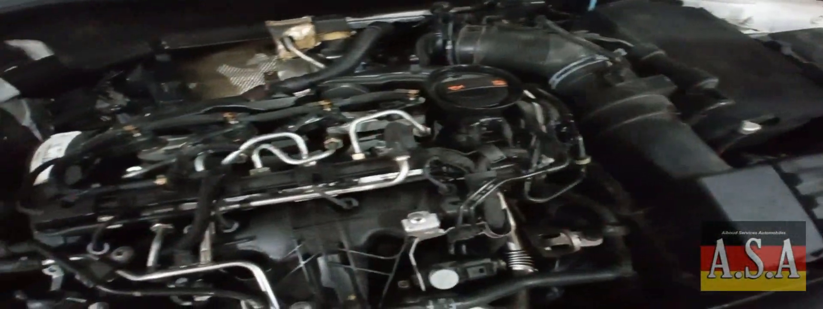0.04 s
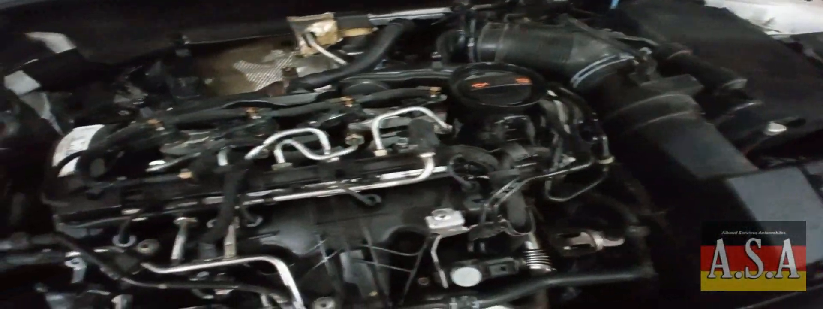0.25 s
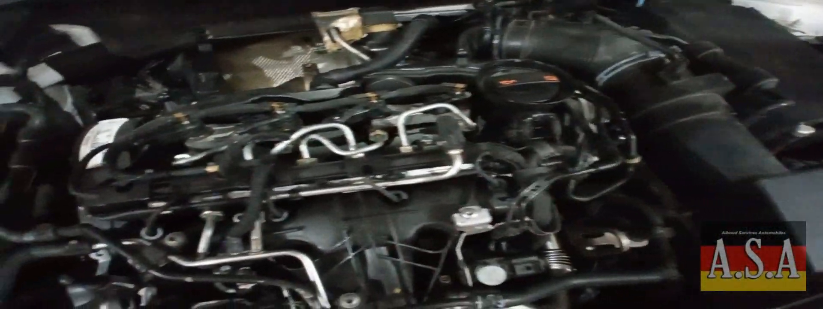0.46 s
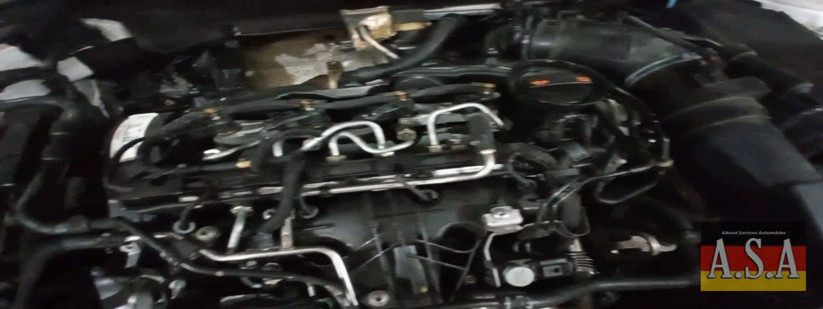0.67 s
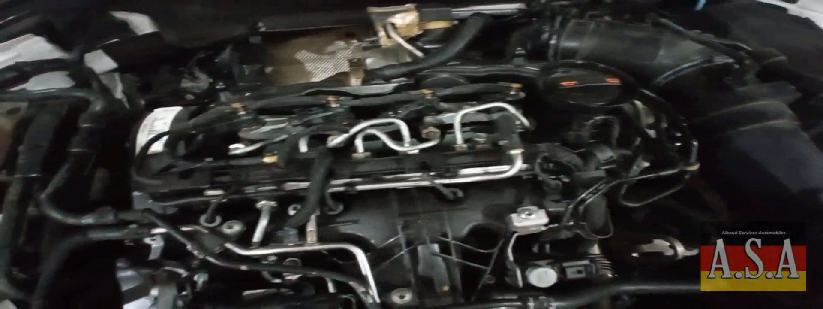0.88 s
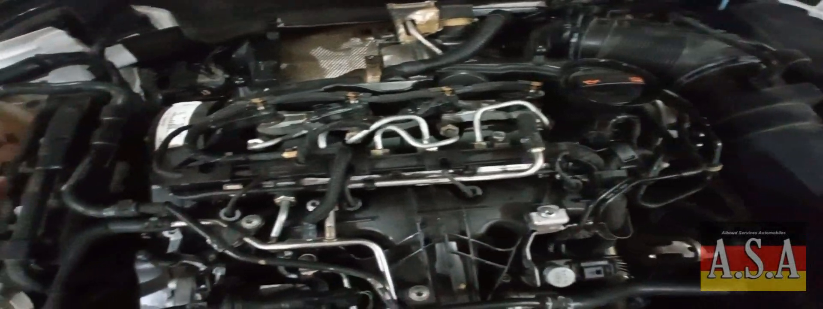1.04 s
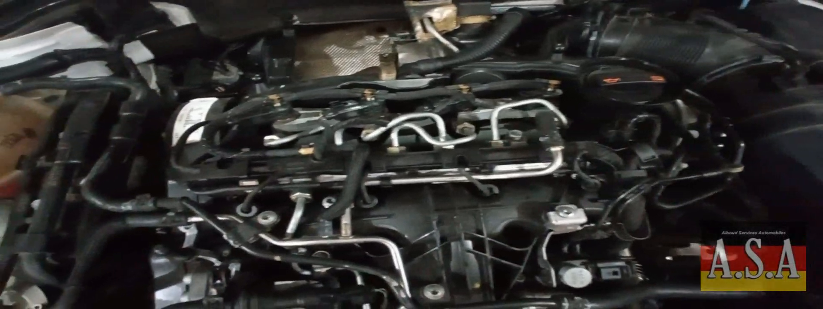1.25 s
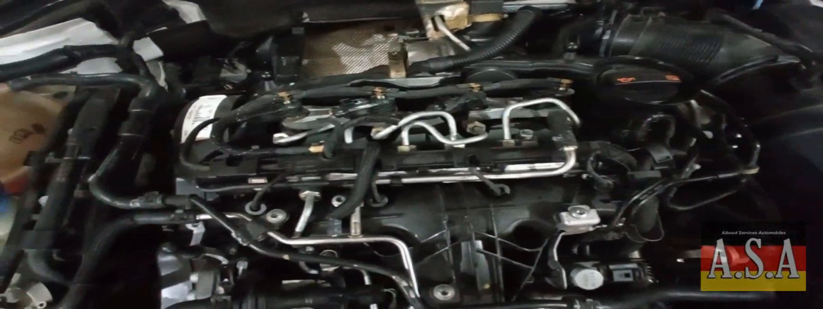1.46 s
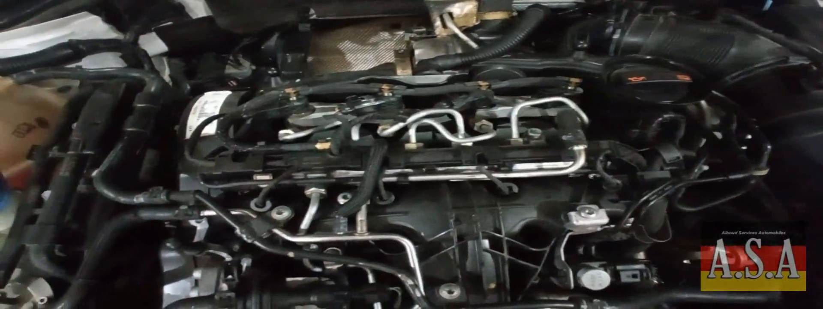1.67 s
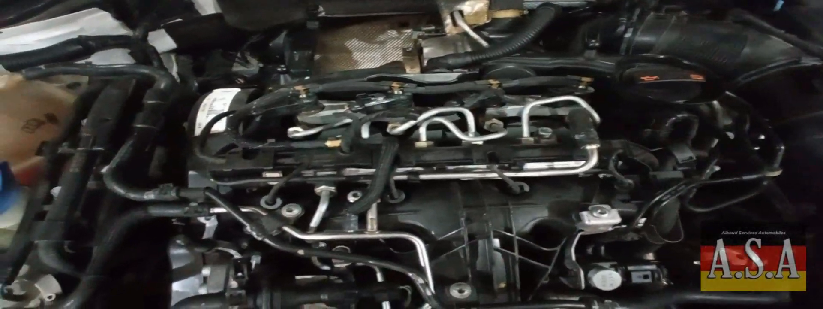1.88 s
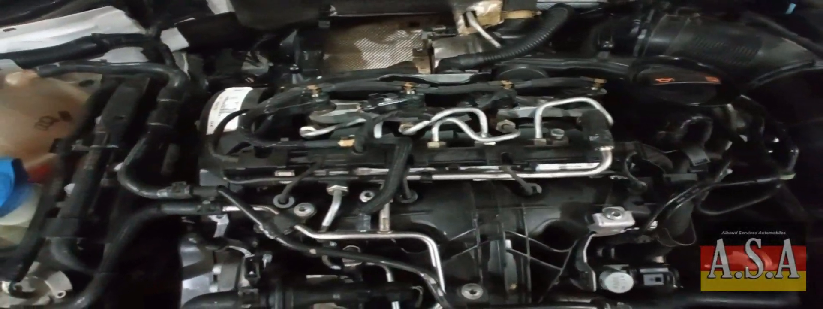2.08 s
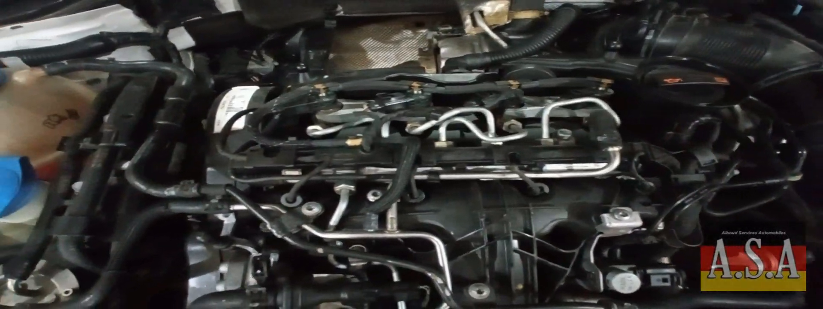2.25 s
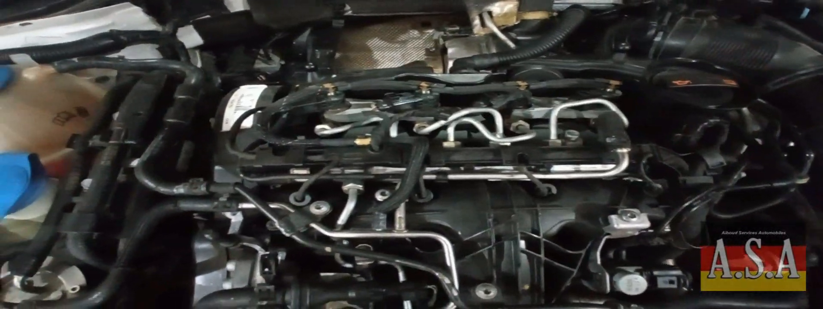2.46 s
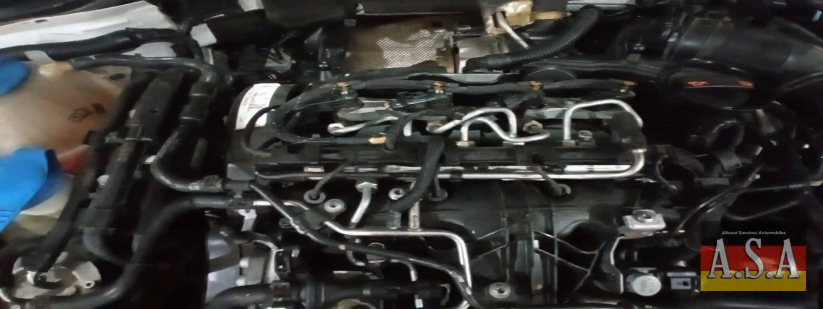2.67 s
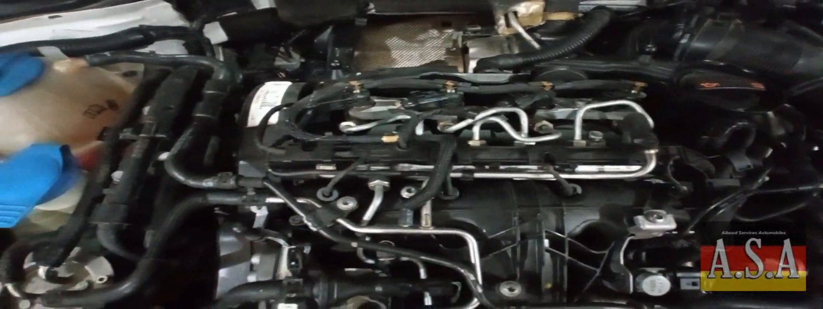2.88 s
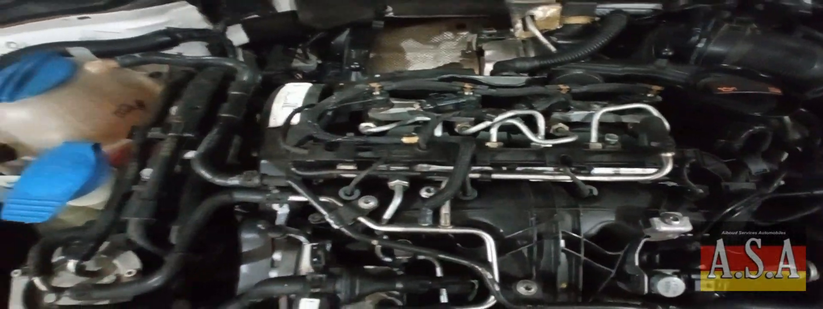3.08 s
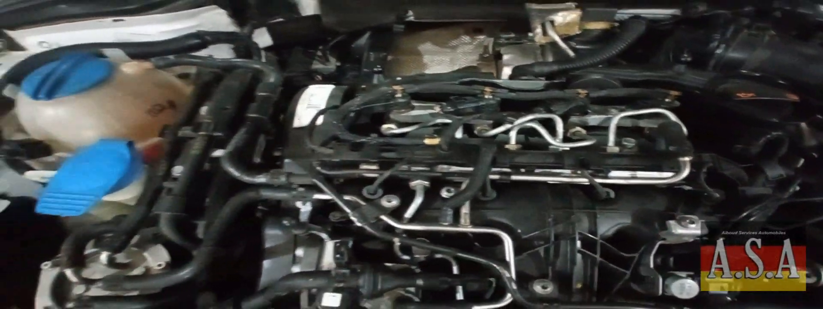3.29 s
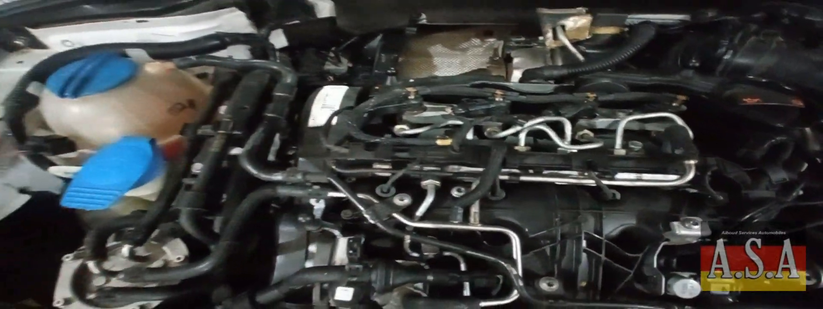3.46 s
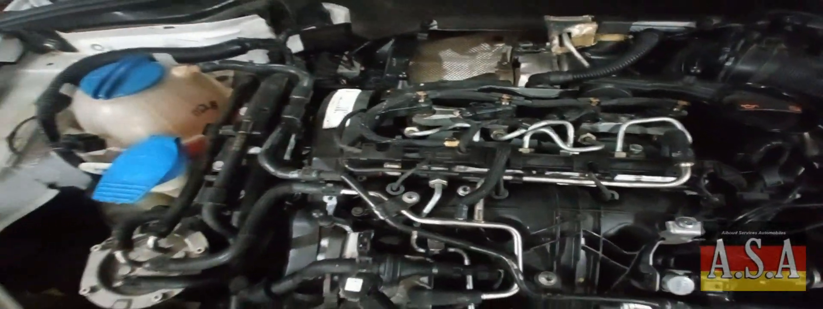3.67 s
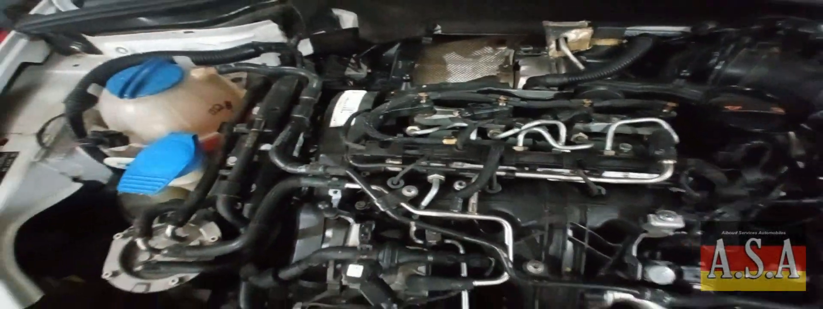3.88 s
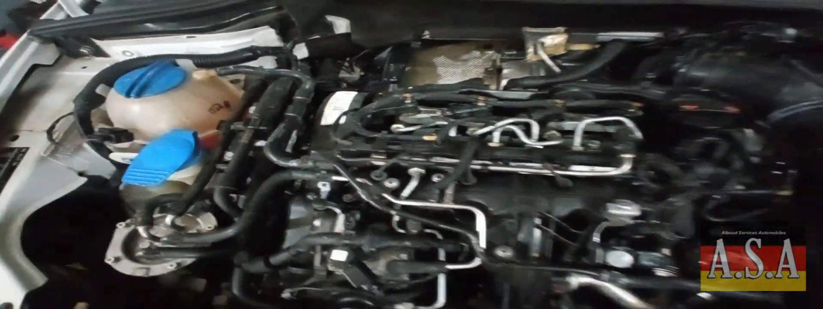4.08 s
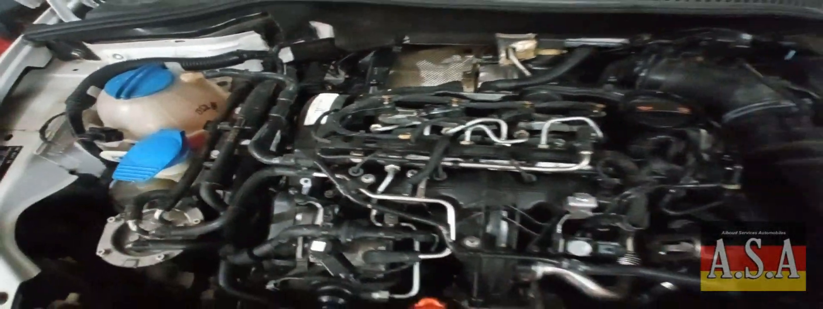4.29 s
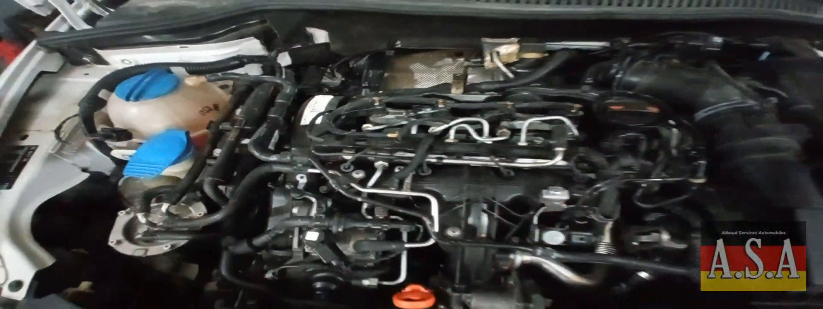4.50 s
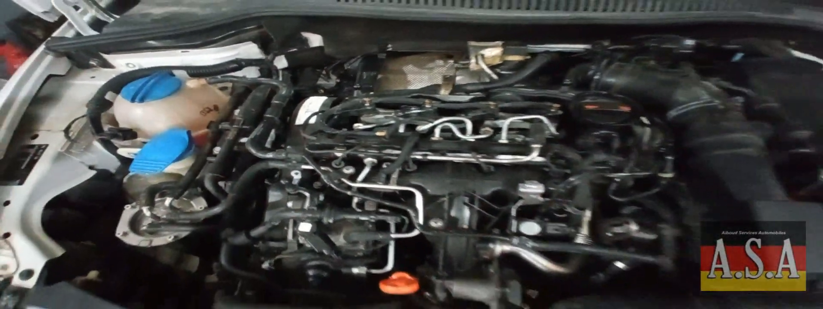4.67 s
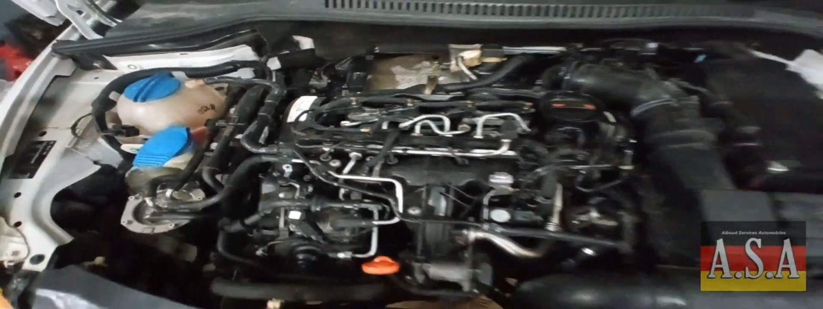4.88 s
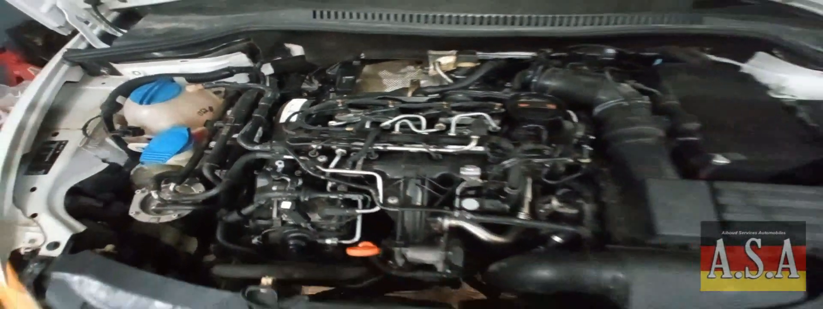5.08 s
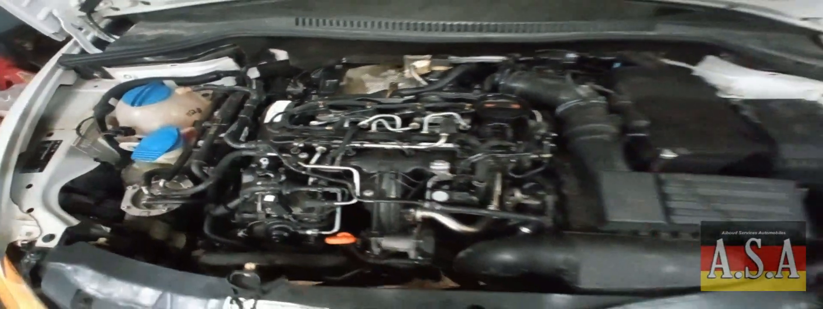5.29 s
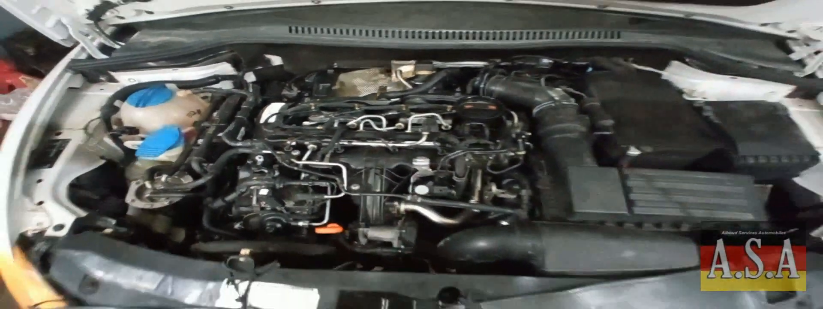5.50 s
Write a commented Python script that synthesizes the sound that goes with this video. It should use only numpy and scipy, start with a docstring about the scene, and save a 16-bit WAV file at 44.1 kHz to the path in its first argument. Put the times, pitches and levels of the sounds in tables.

```python
"""Diesel idling in a garage

A four-cylinder diesel ticks over at 780 rpm under an open bonnet. Every firing brings two injector
clacks, a combustion knock, a pump tick, a gas thump and a valve tap, over ringing pipes and a belt whirr.
The cylinders differ in strength and a little in timing. The microphone glides in from one side and passes
over the injectors. After three seconds the sound fades out and grows a little more distant."""
import sys
import numpy as np
from scipy import signal
from scipy.fft import rfft, irfft
from scipy.io import wavfile
from scipy.ndimage import uniform_filter1d

SR = 44100
rng = np.random.default_rng(int(sys.argv[2]) if len(sys.argv) > 2 else 0)


def inscribe(sig):
    """Save sig as 16-bit PCM at rate SR to the path in sys.argv[1].

    A 1-D sig is mono; a 2-D sig holds one channel per row.
    Samples are clipped to [-1, 1] before scaling.
    """
    pcm = np.round(np.clip(np.atleast_2d(sig).T, -1, 1) * 32767)
    wavfile.write(sys.argv[1], SR, pcm.astype(np.int16))


N = 244299
CYCLE_S, FIRINGS_PER_CYCLE = .1538, 4  # one cycle is two turns of the crank
CYCLES = int(N / SR / CYCLE_S) + 3


def amp(db):
    return 10 ** (np.asarray(db) / 20)


def unit(x):
    return x / np.sqrt(np.mean(x ** 2) + 1e-20)


def curve_at(points, hz):
    f, value = np.transpose(points)
    return np.interp(np.log(hz + 1), np.log(f + 1), value)


def add(mix, s, sound):
    at = int(round(s * SR))
    sound = sound[max(-at, 0):]
    part = mix[max(at, 0):][:len(sound)]
    part += sound[:len(part)]


# reverb time of the garage: f/Hz, t60/s
GARAGE_DECAY = [(100, 0.53), (1000, 0.51), (4000, 0.57), (14000, 0.5)]
def garage(x, size=22050):
    """The walls return a diffuse tail, about half a second long at every pitch."""
    hz, t, noise = signal.stft(rng.standard_normal(size), SR, nperseg=256)
    decay = amp(-60 * t / curve_at(GARAGE_DECAY, hz)[:, None])
    tail = signal.istft(noise * decay * (t > .008), SR, nperseg=256)[1]
    return signal.oaconvolve(x, tail / np.linalg.norm(tail))[:N]


def standing_wave(gas, hz=203.5, width_hz=24):
    """The thumps keep one room mode throbbing."""
    return unit(signal.lfilter(*signal.iirpeak(hz, hz / width_hz, fs=SR), gas))


# resonances of block and covers: f/Hz, width/Hz, boost/dB
BLOCK_MODES = [(316, 32, 5.5), (486, 80, 0), (600, 113, 3.5), (790, 240, 2), (1140, 83, 3.5), (1380, 84, 4),
               (2246, 61, 5), (2654, 173, 5.5), (3363, 210, 5), (4320, 190, 2), (5300, 91, 3),
               (5970, 440, 4.5), (6660, 310, 5.5), (7440, 280, 7)]
def through_block(x, colour, size=8192):
    """The block stamps its resonances on a broad EQ curve; the result has unit RMS."""
    hz = np.fft.rfftfreq(size, 1 / SR)
    peaks_db = sum(boost / (1 + (2 * (hz - f) / width) ** 2) for f, width, boost in BLOCK_MODES)
    cepstrum = irfft(np.log(amp(curve_at(colour, hz) + peaks_db)))
    cepstrum[1:size // 2] *= 2  # minimum phase: no ringing ahead of the hit
    cepstrum[size // 2 + 1:] = 0
    response = irfft(np.exp(rfft(cepstrum)))[:size // 2]
    return unit(signal.oaconvolve(x, response)[:N])


# likeness of one cycle to the next: f/Hz, share of power that repeats
LIKENESS = [(100, 0.82), (350, 0.85), (700, 0.85), (1400, 0.73), (3000, 0.63), (6000, 0.4), (12000, 0.11)]
def rattle(size, memory=.95):
    """One row of vibration per cycle: a slowly drifting pattern under highs that are mostly new."""
    same = curve_at(LIKENESS, np.fft.rfftfreq(size, 1 / SR))
    fresh, drift = rfft(rng.standard_normal((2, CYCLES, size)))
    drift[1:] *= np.sqrt(1 - memory)
    pattern = np.exp(1j * np.angle(np.cumsum(drift, axis=0))) * np.sqrt(size)
    return irfft(np.sqrt(same) * pattern + np.sqrt(1 - same) * fresh, size)


# EQ of the whirring bed: f/Hz, level/dB
WHIRR_EQ = [(20, -32), (45, -15), (100, -0.5), (200, -7), (255, -9), (310, -1.3), (450, -1), (600, 0.8),
            (1100, .8), (2000, -4.5), (4000, -8.5), (6300, -15), (8000, -20), (10000, -16), (13500, -54),
            (14800, -29)]
def whirr(starts):
    """Belt, gears and bearings churn on between the blows."""
    out = np.zeros(N)
    for start, turn in zip(starts, rattle(int(CYCLE_S * SR))):
        add(out, start, turn)
    return through_block(out, WHIRR_EQ)


def hum(starts, orders, lag_s):
    """Sines at multiples of the firing rate, locked to the crank."""
    firings = FIRINGS_PER_CYCLE * np.interp(np.arange(N) / SR, starts + lag_s, np.arange(CYCLES))
    return sum(amp(db) * -np.sqrt(2) * np.sin(2 * np.pi * k * firings) for k, db in orders)


# midrange partials: multiple of the firing rate, level/dB
DRONE_PARTIALS = [(12, -20), (14, -21), (23, -17), (24, -16.5)]
def drone(starts):
    """The valve gear sings a steady chord."""
    return hum(starts, DRONE_PARTIALS, lag_s=.031)


# bass partials: multiple of the firing rate, level/dB
BOOM_PARTIALS = [(2, -14.5), (3, -8), (4, -24), (5, -11), (6, -25), (8, -15.5)]
def boom(starts):
    """The shaking engine supplies the low end."""
    return hum(starts, BOOM_PARTIALS, lag_s=.0279)


def gas_thumps(fire, levels_db, hz=188, length_s=.0053, delay_s=.0264, vary_db=1.5, size=2048):
    """A short push and pull of gas for every firing."""
    t, out = (np.arange(size) - size // 2) / SR, np.zeros(N)
    puff = -np.sin(2 * np.pi * hz * t) * np.exp(-abs(t / length_s) ** 1.12)
    for times, db in zip(fire, levels_db):
        for at, force in zip(times, rng.standard_normal(CYCLES)):
            add(out, at + delay_s + t[0], amp(db + vary_db * force) * puff)
    return unit(out)


def blows(hits, levels_db, colour, rise_s, t60_s, vary_db=.5, size=3072):
    """Each cylinder strikes the block once a cycle with its own noise burst: fast attack, short tail."""
    t, out = np.arange(size) / SR, np.zeros(N)
    envelope = (1 - np.exp(-t / rise_s)) * amp(-60 * t / t60_s)
    for times, db in zip(hits, levels_db):
        for at, burst, force in zip(times, rattle(size), rng.standard_normal(CYCLES)):
            add(out, at, amp(db + vary_db * force) * envelope * burst)
    return through_block(out, colour)


# EQ of the tap, full in the low mids: f/Hz, level/dB
VALVE_EQ = [(30, -55), (150, -22), (300, 5), (600, 6.5), (1200, -2), (2000, -2.5), (3000, -8), (4700, -1.5),
            (8000, -16.5), (16000, -28)]
def valve_taps(fire, levels_db, delay_s=.031):
    """A valve taps at the end of each firing."""
    return blows(fire + delay_s, levels_db, VALVE_EQ, rise_s=.00086, t60_s=.051, vary_db=1.04)


# EQ of the knock, mid-forward: f/Hz, level/dB
KNOCK_EQ = [(30, -55), (260, -17), (400, -6), (800, -2.5), (1400, 1), (1950, 1.5), (2500, -9.5), (4000, -8),
            (6500, -16), (8000, -17.5), (16000, -28)]
def knocks(fire, levels_db, delay_s=.0078):
    """Combustion hammers the block."""
    return blows(fire + delay_s, levels_db, KNOCK_EQ, rise_s=.0012, t60_s=.047, vary_db=0)


def rings(starts, modes, vary_db, detune, rise_s, centred_s=1.12, glide_s=.26, size=4096):
    """Struck modes each beam their own way, so their balance shifts as the microphone glides in."""
    t, out = np.arange(size) / SR, np.zeros(N)
    aside = .5 - .5 * np.tanh((starts - centred_s) / (2 * glide_s))
    for delay, hz, db, t60, side_db in modes:
        envelope = (1 - np.exp(-t / rise_s)) * amp(-60 * t / t60)
        envelope /= envelope.max()
        scatter = rng.standard_normal((len(starts), 2))
        for start, level, (force, off) in zip(starts, db + side_db * aside, scatter):
            tone = np.sin(2 * np.pi * hz * (1 + detune * off) * t)
            add(out, start + delay, amp(level + vary_db * force) * envelope * tone)
    return out


# metallic pings: t/s into the cycle, f/Hz, level/dB, t60/s, gain from the side/dB
PIPE_MODES = [(.0055, 2700, 5.5, 0.031, -15), (.0050, 3360, -5.5, 0.032, 13.5), (0.008, 4250, -2, 0.024, 2),
              (.0420, 3370, -3, 0.019, -6), (.0790, 3200, -3, 0.034, 2.5), (.0800, 3370, -8.5, 0.038, 13.5),
              (.0785, 5100, 5, 0.016, -2), (0.0835, 2700, -0.5, 0.015, -8), (.1210, 3410, 5.5, 0.04, -4),
              (.1195, 7200, -12, 0.028, 10.5), (0.0085, 830, 2.5, 0.032, -5),
              (.0460, 786, 1.5, 0.029, -11.5), (0.028, 612, -2, 0.045, -0.5),
              (.0450, 384, -11.5, 0.033, 10), (0.057, 435, -1.5, 0.06, 0.5), (.0850, 1390, -6, 0.025, -1),
              (0.125, 610, -8, 0.024, 3)]
def pipes_and_covers(starts):
    """Each mode of the pipes and covers rings once a cycle."""
    return rings(starts, PIPE_MODES, vary_db=1.2, detune=.0041, rise_s=.0014)


# bright pings of the fuel line: f/Hz, level/dB, t60/s, gain from the side/dB
FUEL_LINE_MODES = [(4215, 6.8, .012, -18), (4315, -12.5, 0.023, 14.5), (2690, -5.5, 0.032, -13)]
def fuel_line(ticks, lag_s=.0007):
    """The line rings just after every pump tick."""
    modes = [(lag_s, *mode) for mode in FUEL_LINE_MODES]
    return rings(ticks.ravel(), modes, vary_db=.8, detune=.0042, rise_s=.002)


# EQ of the tick, thin and peaky: f/Hz, level/dB
PUMP_EQ = [(30, -54), (300, -6), (1500, -14.5), (3200, -6), (3800, -6), (4250, 0), (4800, -14.5),
           (6500, -3), (8000, -14.5), (9300, -10.5), (12000, -26.5), (13500, -32), (15000, -21)]
def pump(ticks, levels_db):
    """The fuel pump ticks once per firing."""
    return blows(ticks, levels_db, PUMP_EQ, rise_s=.00069, t60_s=.031)


# EQ of the clack, with a hard presence peak: f/Hz, level/dB
CLACK_EQ = [(30, -60), (300, -17), (2000, -8), (2500, -6), (3100, 0.5), (4000, 4), (5000, 1.1),
            (6500, -2.5), (8000, -18), (9300, -5.5), (10800, -16), (11800, -16), (13500, -19),
            (14600, -11.5), (16000, -8.5)]
def injectors(inject, pilot_db, main_db, pilot_s=.0037, main_s=.008, dull_hz=8000, db_per_octave=10):
    """Each injector clacks twice: a pilot shot, then a main shot with a duller top."""
    main_eq = [(hz, db - db_per_octave * max(np.log2(hz / dull_hz), 0)) for hz, db in CLACK_EQ]
    pilot = blows(inject + pilot_s, pilot_db, CLACK_EQ, rise_s=.00041, t60_s=.037)
    main = blows(inject + main_s, main_db, main_eq, rise_s=.00059, t60_s=.04)
    return amp(-5) * pilot + amp(-6) * main


def beamed(x, overhead_s=1.7, pass_s=.99, beam_hz=4900, off_beam_db=-1.4, lift_db=2):
    """The injectors beam treble upward: it is brightest as the microphone passes over them."""
    treble = signal.sosfiltfilt(signal.butter(3, beam_hz, "highpass", fs=SR, output="sos"), x)
    above = np.exp(-((np.arange(N) / SR - overhead_s) / pass_s) ** 2)
    return x - treble + amp(off_beam_db + lift_db * above) * treble


# the groove, a row per cylinder in firing order:
# injection lag/s, pilot/dB, main shot/dB, knock/dB, pump/dB, valve/dB, thump/dB
CYLINDER_ACCENTS = [(.0001, 3, 1.5, -0.5, 4, -3.5, 1), (-.0002, 3, 0, 0.5, 4.5, -5.5, -4.5),
                    (-.0023, 4, 5, 1, 2, -4.5, 2), (.0003, 4, -0.5, 1.5, 4, 0.5, 5.5)]
# closing fade-out, scaled for each layer: t/s, level/dB
FADE_OUT = [(3.0, -0.1), (3.3, -4.5), (4.1, -10), (4.9, -15.5), (5.54, -24)]
def scene(first_s=-.0036, pump_delay_s=.0186):
    """The crank turns almost evenly and times every source."""
    wobble = .0003 * uniform_filter1d(rng.standard_normal(CYCLES), size=5)
    starts = first_s + CYCLE_S * (np.arange(CYCLES) - 1) + wobble
    fire = starts + CYCLE_S * np.arange(FIRINGS_PER_CYCLE)[:, None] / FIRINGS_PER_CYCLE
    ticks = fire + pump_delay_s
    lag, pilot_db, main_db, knock_db, pump_db, valve_db, thump_db = np.transpose(CYLINDER_ACCENTS)
    clatter = injectors(fire + lag[:, None], pilot_db, main_db)
    clatter += amp(-10) * pump(ticks, pump_db) + fuel_line(ticks)
    clatter += amp(-1.5) * pipes_and_covers(starts)
    block = amp(-4) * knocks(fire, knock_db) + amp(-7.5) * valve_taps(fire, valve_db)
    block += amp(-3) * whirr(starts) + drone(starts)
    gas = gas_thumps(fire, thump_db)
    # the lower a layer, the more slowly it fades
    fade_db = np.interp(np.arange(N) / SR, *np.transpose(FADE_OUT))
    metal = amp(-33 + 1.04 * fade_db) * beamed(clatter) + amp(-35.5 + .97 * fade_db) * block
    bass = amp(-44.5 + .9 * fade_db) * (amp(-7) * gas + boom(starts))
    # the mix gets wetter as it fades, so it sounds a little more distant
    send = metal + amp(-50 + .7 * fade_db) * gas
    walls = amp(-14.5 - .22 * fade_db) * garage(send)
    walls += amp(-55 + .58 * fade_db) * standing_wave(gas)
    return (metal + bass + walls)[None]


def record(dry, low_cut_hz=30, high_cut_hz=15950):
    """The microphone drops the deepest rumble; a steep high cut trims the top."""
    thin = signal.sosfilt(signal.butter(2, low_cut_hz, "highpass", fs=SR, output="sos"), dry)
    high_cut = signal.firwin(511, high_cut_hz, window=("kaiser", 9), fs=SR)
    return signal.oaconvolve(thin, high_cut[None], "same")


dry = scene()
out = record(dry)
inscribe(out)
```